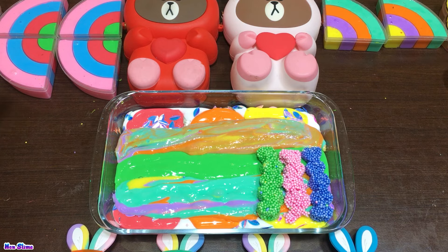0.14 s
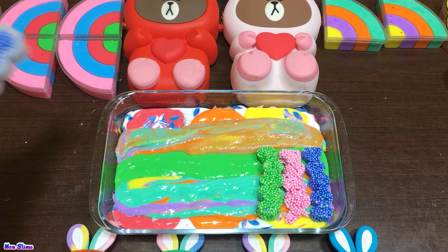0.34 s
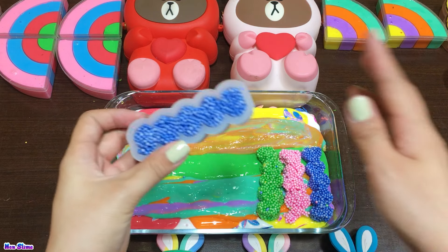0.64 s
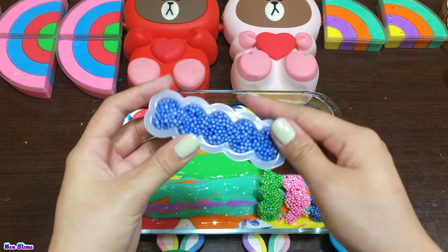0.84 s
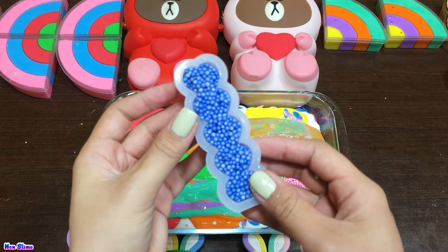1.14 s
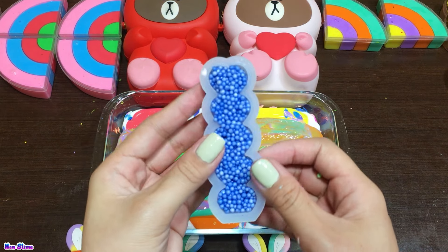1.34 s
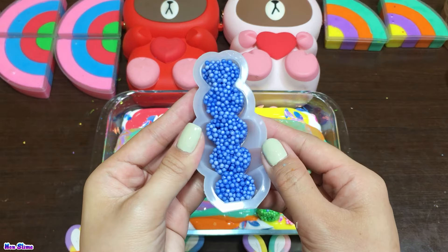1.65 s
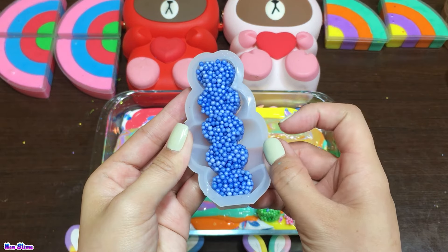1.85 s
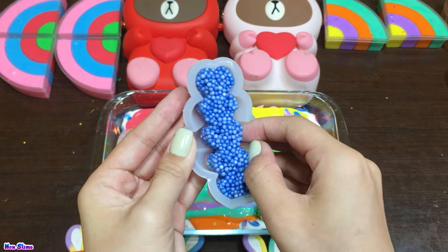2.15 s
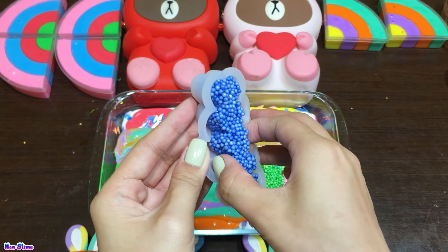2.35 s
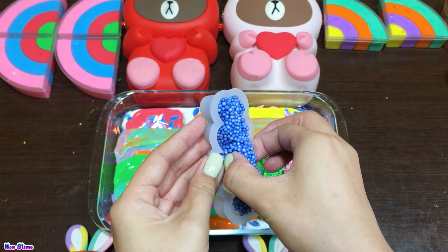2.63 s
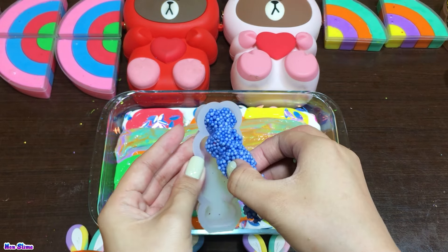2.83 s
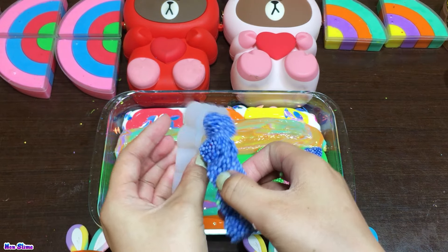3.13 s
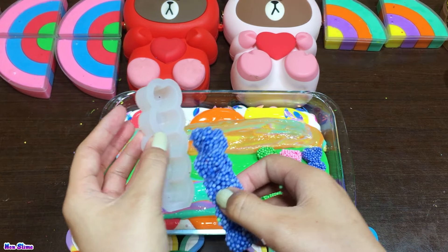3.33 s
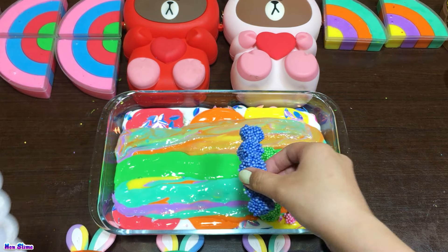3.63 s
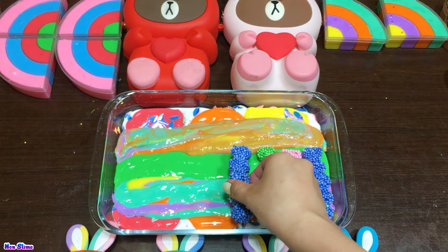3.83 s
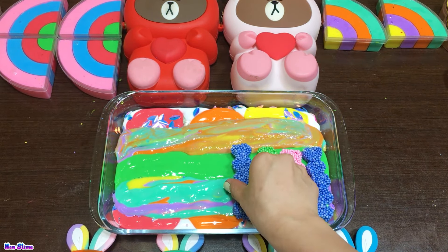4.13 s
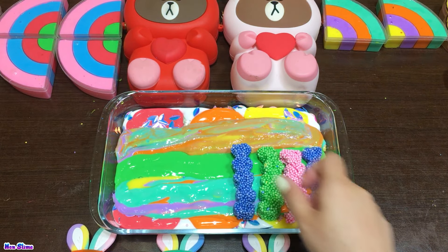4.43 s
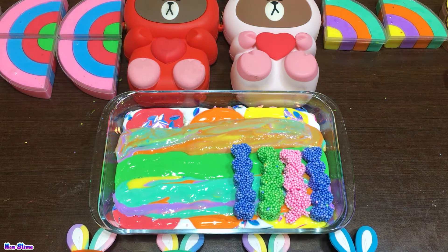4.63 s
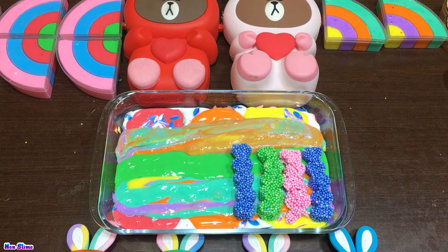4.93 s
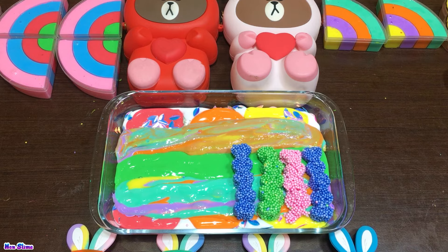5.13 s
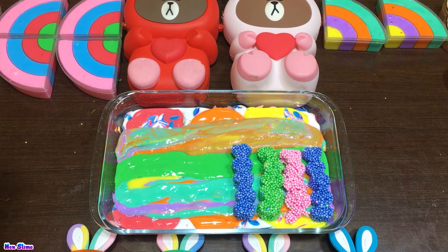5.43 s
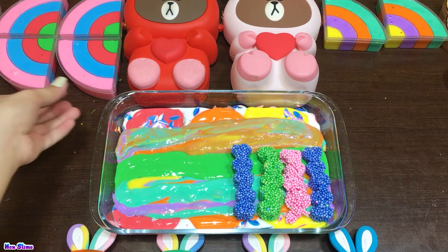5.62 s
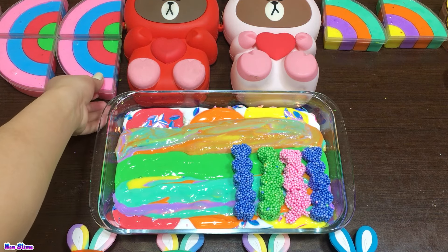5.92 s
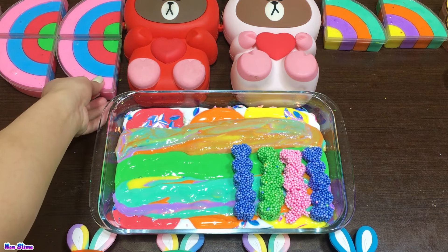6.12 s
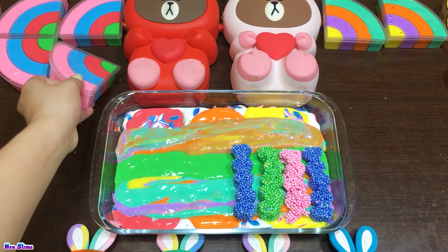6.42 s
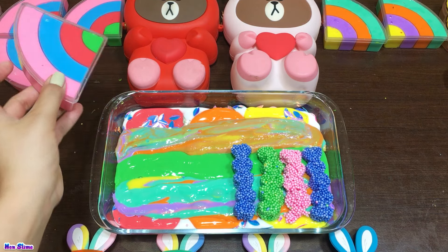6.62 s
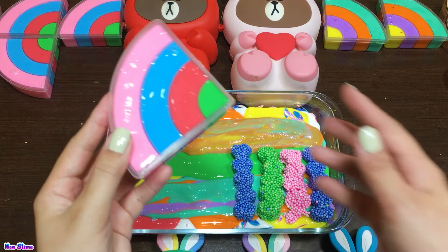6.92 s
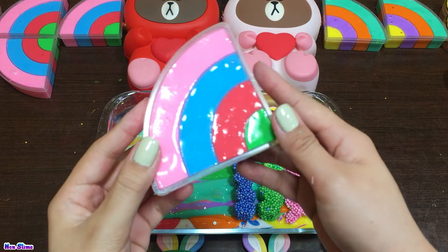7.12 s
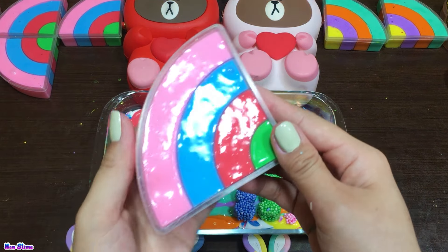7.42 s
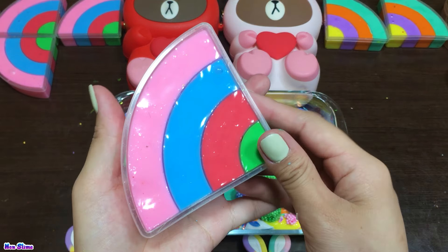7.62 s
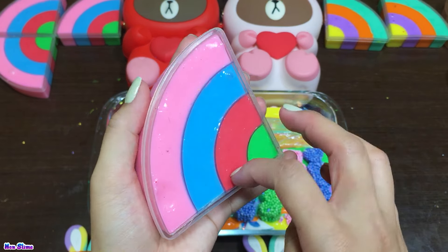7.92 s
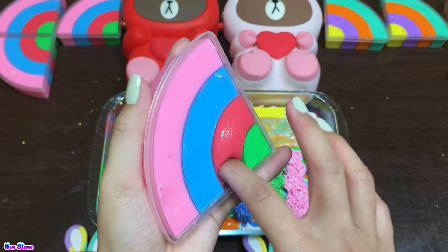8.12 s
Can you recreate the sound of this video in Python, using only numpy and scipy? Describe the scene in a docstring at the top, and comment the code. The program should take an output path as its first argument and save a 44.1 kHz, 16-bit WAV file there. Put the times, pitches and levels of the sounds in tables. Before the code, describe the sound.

In a quiet room with a steady low machine hum and faint hiss, fingers brush a thin plastic mould close to the microphone. Bead slime peels out of it with sharp, sticky snaps and crackles. Farther off, the empty mould drops on a wooden table and chatters. A hollow box slides briefly over the wood with soft bumps, then fingers brush and click on its lid, close again.

```python
"""A quiet room with a wooden table: a machine hums throughout and the microphone hisses.
Close to the microphone, fingers brush a thin plastic mould, then peel bead slime out of it: sticky threads
snap, crackle and ring its wall, and a soft bump comes through the table. Farther off, the empty mould
drops on the table and chatters. A hollow box is slid over the wood with a few bumps, and the hum
dips briefly as a hand on the table damps it. Last, close again, fingers brush the lid of the box."""
import sys
import numpy as np
from scipy import signal
from scipy.fft import rfft, irfft, next_fast_len
from scipy.io import wavfile
from scipy.ndimage import map_coordinates

SR = 44100
rng = np.random.default_rng(int(sys.argv[2]) if len(sys.argv) > 2 else 0)


def store_pcm(level_fs):
    """Save levels as 16-bit WAV."""
    pcm = np.round(np.clip(level_fs, -1, 1) * 32767).astype(np.int16)
    wavfile.write(sys.argv[1], SR, np.atleast_2d(pcm).T)


N = 364266


def amp(db):
    """dB to gain."""
    return 10 ** (np.asarray(db) / 20)


def unit(x):
    """Scaled to rms 1."""
    return x / np.sqrt(np.mean(x ** 2) + 1e-20)


def along(points, hz):
    """Interpolate (f/Hz, value) points on a log frequency axis."""
    f, values = np.transpose(points)
    return np.interp(np.log(hz + 1), np.log(f + 1), values)


def filtered(x, response):
    """x through a gain that depends on frequency."""
    size = next_fast_len(x.shape[-1] + 8192)
    return irfft(rfft(x, size) * response(np.fft.rfftfreq(size, 1 / SR)), size)[..., :x.shape[-1]]


def coloured(x, points):
    """x through a minimum-phase (f/Hz, level/dB) filter, which keeps attacks sharp."""
    cepstrum = irfft(np.log(amp(along(points, np.fft.rfftfreq(1024, 1 / SR)))))
    cepstrum[1:512] *= 2
    cepstrum[513:] = 0
    impulse = irfft(np.exp(rfft(cepstrum)))[:400]
    return signal.fftconvolve(x, impulse / np.linalg.norm(impulse))[:N]


def scatter(times, rows):
    """Short sounds summed at their times."""
    at = np.round(np.asarray(times) * SR).astype(int)[:, None] + np.arange(rows.shape[1])
    return np.bincount(at.ravel(), rows.ravel(), N + SR)[:N]


def bursts(times, db, fast_t60, tail_t60, tail_db):
    """Noise bursts with a sharp start, a fast fall and a longer tail."""
    t = np.arange(400) / SR
    noise = rng.standard_normal((len(times), len(t)))
    noise[:, 0] = 3 * np.sign(noise[:, 0])  # the break itself is one sharp step
    rows = (amp(-60 * t / fast_t60) + amp(tail_db - 60 * t / tail_t60)) * noise
    attack_size = np.linalg.norm(rows[:, :20], axis=1, keepdims=True)
    return scatter(times, rows * amp(db)[:, None] / attack_size)


def pings(times, db, hz, cycles, rough):
    """Damped sines with a wandering phase; they fall 60 dB in so many cycles."""
    turns = np.arange(400) / SR * hz[:, None]
    wander = rough * np.cumsum(rng.standard_normal(turns.shape), axis=1)
    envelope = amp(db[:, None] - 60 * turns / cycles) * (1 - np.exp(-turns / 0.33))
    return scatter(times, envelope * np.sin(2 * np.pi * turns + wander))


# Narrow rumbles of the machine in the room: f/Hz, width/Hz, level/dB
MACHINE_RUMBLES = [(48.7, 4.5, -63.5), (100.4, 5.4, -68), (159.7, 11.1, -66), (209.6, 20, -71),
                   (314.4, 14, -74), (373.2, 7.66, -80), (707, 32, -80.5)]
def machine_hum():
    """A low tone beats with a rumble just under it; fuzzy overtones and a thin whine lie above."""
    hum_hz, hum_db, whine_hz, whine_db = 53.13, -53.5, 401.5, -73
    t = np.arange(N) / SR
    hum_dip = np.cumsum([6.28, .12, .52, .04])  # start/s, fall/s, hold/s, return/s
    dip_db = -14 * np.interp(t, hum_dip, [0, 1, 1, 0])
    out = np.sqrt(2) * amp(hum_db + dip_db) * np.sin(2 * np.pi * hum_hz * t)
    drift_hz = .5 * map_coordinates(rng.standard_normal(60), [t * 6])
    out += np.sqrt(2) * amp(whine_db) * np.sin(2 * np.pi * np.cumsum(whine_hz + drift_hz) / SR)
    for hz, width, db in MACHINE_RUMBLES:
        rumble = filtered(rng.standard_normal(N), lambda f: np.exp(-2 * ((f - hz) / width) ** 2))
        out += amp(db + 0.24 * dip_db) * unit(rumble)
    return out


# Noise floor at the microphone: f/Hz, level/dB
NOISE_FLOOR = [(20, -64), (40, -18.5), (75, -19.5), (125, -25), (250, -26), (430, -31), (500, -34),
               (800, -40.5), (1000, -40.5), (3000, -45.5), (6000, -46.5), (10000, -51), (15700, -52),
               (15950, -90)]
def room_tone():
    """Steady low room noise under the hiss of the microphone."""
    return amp(-61.5) * unit(filtered(rng.standard_normal(N), lambda f: amp(along(NOISE_FLOOR, f))))


def swells(table):
    """Short grainy swells of band noise."""
    out = np.zeros(N + SR)
    for middle, length, db, hz, octaves in table:
        t = np.arange(-2 * length, 2 * length, 1 / SR)
        grit = rng.standard_normal(len(t))
        grit *= amp(3 * np.repeat(rng.standard_normal(len(t)), 24)[:len(t)])
        band = filtered(grit, lambda f: np.exp(-.5 * (np.log2((f + 1) / hz) / octaves) ** 2))
        envelope = amp(db) * np.exp(-2 * (t / length) ** 2)
        out[round((middle - 2 * length) * SR):][:len(t)] += envelope * unit(band)
    return out[:N]


# Finger strokes close to the microphone: middle t/s, length/s, level/dB, f/Hz, width/octaves
FINGER_STROKES = [(.42, 0.009, -66.5, 2460, .8), (0.814, .007, -62, 1940, 0.26),
                  (1.082, .012, -67.5, 8500, .4), (1.288, 0.0016, -52, 10000, 0.88),
                  (2.043, 0.0031, -54.5, 5000, 2.6), (4.183, 0.0033, -55, 6000, 4.4),
                  (4.197, 0.0039, -61, 6000, 0.57), (4.299, 0.021, -60, 4700, 1.1),
                  (4.353, 0.004, -58.5, 8000, 3.8), (5.345, 0.0162, -62.5, 10000, 1.2),
                  (6.604, 0.016, -55, 11000, 1.2), (7.29, 0.0035, -63, 1190, 0.54),
                  (7.42, .03, -71, 7500, .6), (7.755, 0.021, -62, 4900, 0.36),
                  (7.77, 0.056, -63, 9300, 0.26), (7.792, 0.00374, -57, 1500, 1.3),
                  (7.814, 0.0086, -39.5, 4680, 0.23), (7.815, 0.012, -52, 9400, 0.2),
                  (7.816, 0.0053, -54, 974, 0.204), (8.073, 0.034, -70.5, 13000, .3),
                  (8.201, 0.12, -62, 6770, 0.38)]
def finger_brushes():
    """Fingers rub plastic and slime, each stroke a swell of friction noise."""
    return swells(FINGER_STROKES)


# Colour of a bright crack: f/Hz, level/dB
CRACK_COLOUR = [(3000, -43), (4500, 1.5), (6000, 1.5), (7500, 0.5), (9000, 5), (11000, 2), (15500, 2.5),
                (17000, -33.5)]
# Colour of the flexing mould wall: f/Hz, level/dB
WALL_COLOUR = [(300, -29.5), (700, -5.5), (1500, -1), (2200, -4.5), (3300, 4), (4500, 2.5), (6500, -24)]
# Threads and beads letting go of the plastic, close up: t/s, crack level/dB, wall level/dB, wall f/Hz
THREAD_SNAPS = [(1.5773, -31, -41.5, 1500), (1.5995, -41, -35.5, 1990), (1.6207, -25.5, -38, 1730),
                (1.6246, -25, -30, 1400), (1.631, -23.5, -27.5, 2140), (1.64, -35, -38, 3120),
                (1.646, -27, -28, 3000), (1.651, -17, -24, 1810), (1.6585, -33, -23, 3600),
                (1.662, -23, -29, 3200), (1.6676, -28, -29, 1980), (1.6756, -13.5, -30, 3550),
                (1.6786, -35, -28.5, 1950), (1.6881, -15.5, -24, 3900), (1.692, -21, -33, 3100),
                (1.6953, -26, -23, 3350), (1.703, -19, -36, 4600), (1.7094, -18, -28.5, 1500),
                (1.7156, -27, -30.5, 1470), (1.723, -35, -28.5, 4340), (1.7379, -45, -34, 3300),
                (1.7466, -24.5, -33, 3330), (1.7773, -32.5, -32.5, 4470), (1.829, -39, -34.5, 4100),
                (1.8413, -40, -42, 2000), (1.8575, -49, -38.5, 1980), (1.887, -43, -39.5, 3100),
                (1.9001, -33, -47, 4500), (1.927, -31, -36, 1960), (1.931, -29, -44, 1500),
                (1.9442, -44, -44, 4600), (1.9697, -37, -38, 2880), (1.996, -33, -40, 4630),
                (2.109, -47, -41.5, 3340), (2.1192, -33, -41, 4400), (2.1328, -21.5, -33, 4200),
                (2.1582, -36, -44, 1320), (2.1715, -30, -29, 2070), (2.18, -31, -42, 4500),
                (2.1962, -20.5, -32, 4470), (2.202, -27.5, -38, 4600), (2.2144, -24, -27.5, 1500),
                (2.2257, -41, -54, 4700), (2.236, -35, -46, 2000), (2.2405, -26, -37, 3220),
                (2.2485, -30, -35, 4000), (2.2614, -32.5, -58, 4500), (2.3163, -36.5, -43, 4570),
                (2.3499, -40.5, -45, 4800), (2.377, -37.5, -45, 4500), (2.4051, -25.5, -36.5, 4400),
                (2.4979, -39, -62, 4600), (2.5806, -32.5, -39, 3000), (2.594, -42, -38, 3230),
                (2.6132, -39.5, -41, 3600), (2.6212, -24, -29, 4660), (2.6266, -23, -31.5, 4500),
                (2.6812, -43, -36.5, 1770), (2.6984, -24.5, -53, 4900), (2.7112, -27, -30, 2580),
                (2.7177, -26, -35, 2780), (2.7366, -34, -48, 2600), (2.748, -30, -48, 2600),
                (2.763, -26.5, -38, 2600), (2.792, -42, -41, 2300), (2.8031, -36, -32, 3560),
                (2.806, -26.5, -52, 2400), (2.8172, -26, -36, 2600), (2.831, -36, -30, 2840),
                (2.8422, -46, -38, 2170), (2.8583, -40, -42, 2500), (2.8748, -29.5, -33, 2600),
                (2.882, -34, -50, 2600), (2.9184, -38, -57, 2500), (2.9248, -39, -55, 4300),
                (2.966, -40, -37, 2400), (3.0602, -17, -30, 4350), (3.066, -33, -47.5, 4700),
                (3.111, -30, -46, 4500), (3.1253, -27.5, -33, 2530), (3.1539, -17.5, -24, 3740),
                (3.176, -27.5, -44, 3800), (3.186, -33.5, -49, 3900), (3.207, -36, -49, 2300),
                (3.216, -36, -26, 2100), (4.2986, -56, -43.5, 3120), (6.7299, -50, -41.5, 1820),
                (7.8092, -47, -33.5, 4530), (7.8156, -31, -27.5, 4380), (7.962, -46, -51, 4500)]
def thread_snaps():
    """Each snap cracks brightly and sets the mould wall ringing for a few cycles."""
    times, crack_db, wall_db, hz = np.transpose(THREAD_SNAPS)
    crack = bursts(times, crack_db + 4, fast_t60=.0015, tail_t60=0.01, tail_db=0.5)
    push = bursts(times, wall_db + 3, fast_t60=0.00074, tail_t60=0.021, tail_db=-9.5)
    ring = pings(times, wall_db - 1.5, hz, cycles=10, rough=.22)
    return coloured(crack, CRACK_COLOUR) + coloured(push, WALL_COLOUR) + ring


# Tugs on the slime, close up: middle t/s, length/s, crack level/dB, ring level/dB
SLIME_TUGS = [(1.59, 0.021, -67, -74), (1.668, 0.065, -40.5, -45.5), (1.87, 0.23, -65, -72),
              (2.22, 0.051, -54.5, -62), (2.38, 0.094, -70, -79), (2.613, 0.044, -59, -63),
              (2.704, 0.054, -57, -56), (2.833, 0.072, -57, -55), (2.967, 0.095, -61.5, -62.5),
              (3.066, 0.037, -67, -61.5), (3.18, 0.0585, -58.5, -63), (3.214, 0.016, -51.5, -50.5),
              (3.278, .04, -65.5, -74)]
def slime_crackle():
    """A swarm of small random snaps swells and fades with each tug of the fingers."""
    draws = rng.random((6000, 3))
    times = draws[:, 0] * (N / SR)
    size_db = -np.log(1 - .97 * draws[:, 1:]) * [5, 4]  # a few are much larger than the rest
    cracks = bursts(times, size_db[:, 0], fast_t60=0.0044, tail_t60=0.0092, tail_db=-11)
    hz = 2350 * np.exp(.17 * rng.standard_normal(len(times)))
    hz[::3] *= 1.85  # every third rings a higher mode of the wall
    rings = pings(times[::-1], size_db[:, 1], hz, cycles=24, rough=.1)
    t = np.arange(N) / SR
    crack_gain, ring_gain = sum(amp([[crack_db], [ring_db]]) * np.exp(-2 * ((t - middle) / length) ** 2)
                                for middle, length, crack_db, ring_db in SLIME_TUGS)
    return crack_gain * unit(coloured(cracks, CRACK_COLOUR)) + ring_gain * unit(rings)


# Soft bumps heard through the table: t/s, level/dB, f/Hz
TABLE_BUMPS = [(2.199, -46, 66.4), (6.39, -40, 42), (6.411, -38, 74), (6.494, -38.5, 98), (6.6, -56, 75),
               (6.72, -50, 70)]
def table_bumps():
    """Each bump is a few damped low cycles."""
    attack_s, t60 = 0.0042, 0.094
    out, t = np.zeros(N), np.arange(SR // 5) / SR
    for start, db, hz in TABLE_BUMPS:
        envelope = amp(db - 60 * t / t60) * (1 - np.exp(-t / attack_s))
        out[round(start * SR):][:len(t)] += envelope * np.sin(2 * np.pi * hz * t)
    return out


# Colour of the empty mould's knock: f/Hz, level/dB
KNOCK_COLOUR = [(88, -51), (150, -7), (353, -4), (777, -6), (906, -5.5), (1340, -8), (1800, -8),
                (2670, -7.5), (9000, -22), (11700, -56), (19800, -120)]
# Low modes of the table and higher ringing of the mould: f/Hz, level/dB, t60/s
KNOCK_MODES = [(110, -5.5, 0.12), (239, -5.5, 0.065), (264, -7, 0.11), (370, -1.5, 0.049), (520, -6, 0.064),
               (930.5, 4, 0.13), (1870, -7, 0.04)]
# The mould landing, farther from the microphone: t/s, level/dB, treble offset/dB, ring offset/dB
MOULD_CONTACTS = [(4.7142, -22, 6.5, -26.5), (4.7195, -34, -0.5, -19), (4.7233, -28, 5, -24),
                  (4.728, -29, 4, -27), (4.7329, -42, -8, -9), (4.9844, -30, -12.5, -8),
                  (4.99, -44.5, -14.5, 11), (5.003, -48.5, -14.5, 14.5)]
def mould_drop():
    """Every contact cracks and knocks; the table rings low and the mould higher."""
    times, db, treble_db, ring_offset_db = np.transpose(MOULD_CONTACTS)
    knock = bursts(times, db + 9.5, fast_t60=0.017, tail_t60=0.031, tail_db=-7)
    crack = bursts(times, db + treble_db - 1.5, fast_t60=.006, tail_t60=.03, tail_db=-11)
    out = coloured(knock, KNOCK_COLOUR) + coloured(crack, CRACK_COLOUR)
    t = np.arange(SR // 4) / SR
    tilts = .55 * treble_db  # dB per octave: soft contacts reach only the low modes
    for start, ring_db, tilt in zip(times, db + ring_offset_db, tilts):
        for hz, mode_db, t60 in KNOCK_MODES:
            struck_db = ring_db + mode_db + tilt * np.log2(hz / 100) + rng.normal(0, 1.5)
            wander = 0.0096 * np.cumsum(rng.standard_normal(len(t)))  # the modes do not ring clean
            ring = amp(struck_db - 60 * t / t60) * np.sin(2 * np.pi * hz * t + wander)
            out[round(start * SR):][:len(t)] += ring
    return out


# The mould settling on the table: middle t/s, length/s, level/dB, f/Hz, width/octaves
MOULD_CHATTER = [(4.7255, .009, -35.5, 1720, 0.33), (4.7245, 0.0083, -39.5, 6300, 0.48)]
def mould_chatter():
    """The thin plastic chatters briefly as it settles."""
    return swells(MOULD_CHATTER)


# Resonances of the hollow box: f/Hz, width/Hz, level/dB
BOX_RESONANCES = [(152, 40, 4), (293, 110, 7), (764, 200, 6), (1210, 220, -0.5), (1570, 95, 0),
                  (1850, 230, -3), (2360, 450, -12), (3420, 1600, -15)]
# The box dragged over the table, farther from the microphone: t/s, level/dB
BOX_DRAG = [(6.13, -78), (6.2, -57), (6.25, -55), (6.29, -48), (6.39, -46), (6.43, -49.5), (6.46, -66),
            (6.54, -85)]
def box_slide():
    """Uneven friction shakes the hollow box; fine grit hisses above."""
    friction = rng.standard_normal(N) * amp(2.9 * np.repeat(rng.standard_normal(N // 100), 120)[:N])
    body = lambda f: np.sqrt(sum(amp(2 * db) / (1 + ((f - hz) / width) ** 4)
                                 for hz, width, db in BOX_RESONANCES))
    grit = amp(-23.5) * unit(coloured(rng.standard_normal(N), CRACK_COLOUR))
    drag_db = np.interp(np.arange(N) / SR, *np.transpose(BOX_DRAG), left=-120, right=-120)
    return amp(drag_db) * (unit(filtered(friction, body)) + grit)


# Decay of the room around the table: f/Hz, t60/s
ROOM_DECAY = [(200, 0.5), (1500, 0.18), (4000, 0.17), (8000, 0.077), (15000, 0.11)]
def in_room(x, tail_db):
    """The direct sound and a short, slightly delayed tail in which the treble dies first."""
    hz, t, noise = signal.stft(rng.standard_normal(SR // 2), SR, nperseg=256)
    tail = signal.istft(noise * amp(-60 * t / along(ROOM_DECAY, hz)[:, None]), SR, nperseg=256)[1]
    return x + amp(tail_db) * signal.fftconvolve(np.pad(x, (250, 0)), tail / np.linalg.norm(tail))[:N]


def scene():
    """One microphone: the hands close to it, the table farther off with more of the room."""
    hands = in_room(finger_brushes() + thread_snaps() + slime_crackle(), tail_db=-18.5)
    mould = in_room(mould_drop() + mould_chatter(), tail_db=-11.0)
    box = in_room(box_slide(), tail_db=-8.5)
    return (machine_hum() + room_tone() + hands + table_bumps() + mould + box)[None]


# Peak and dips of the microphone housing: f/Hz, width/Hz, level/dB
MIC_HOUSING = [(4940, 346, -3), (8860, 940, 1.5), (10410, 300, -4)]
def record(dry):
    """The housing colours the treble; nothing is kept above the band limit."""
    top_hz = 16850
    housing_db = lambda f: sum(db * np.exp(-2 * ((f - hz) / width) ** 2) for hz, width, db in MIC_HOUSING)
    return filtered(dry, lambda f: amp(housing_db(f)) * (f < top_hz))


dry = scene()
out = record(dry)
store_pcm(out)
```